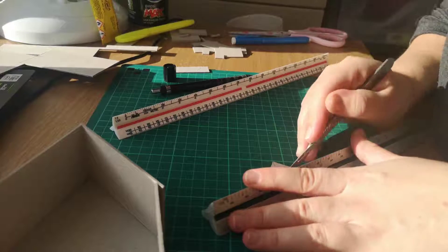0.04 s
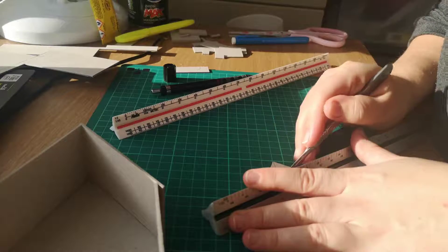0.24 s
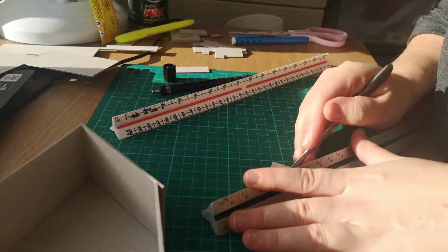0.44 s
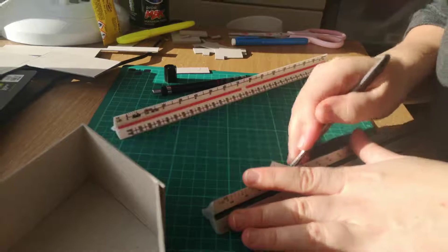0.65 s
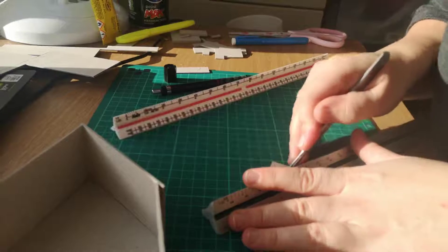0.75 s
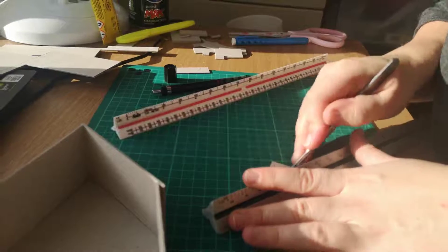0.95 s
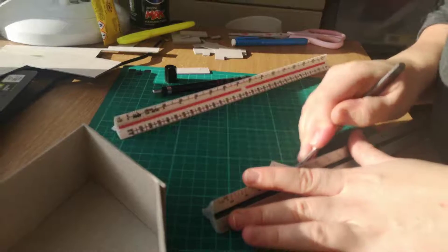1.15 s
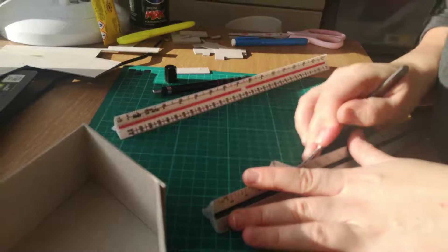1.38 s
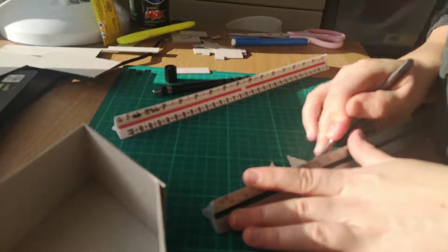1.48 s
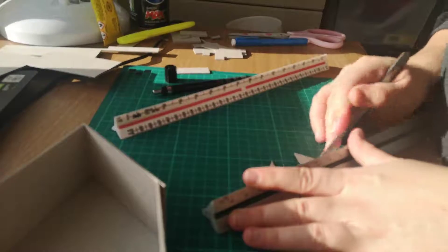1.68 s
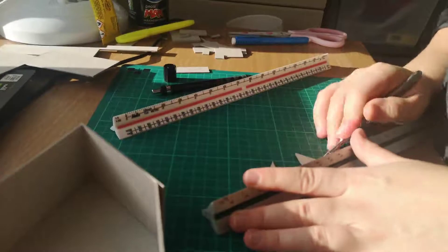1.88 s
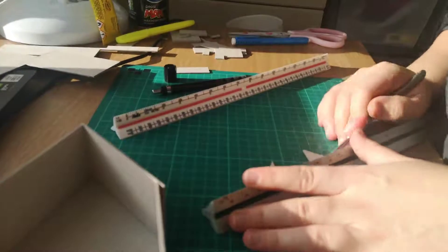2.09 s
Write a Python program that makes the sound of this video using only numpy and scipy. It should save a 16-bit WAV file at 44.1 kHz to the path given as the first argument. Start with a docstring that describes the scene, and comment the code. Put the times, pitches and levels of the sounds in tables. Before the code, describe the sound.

A craft knife scratches through thin card along a ruler, then knocks and skids on the mat

```python
"""A craft knife scores thin card along a ruler, on a cutting mat on a desk in a small quiet room.
The tip scratches and rings, then the blade cuts, drops onto the mat and skids: random fibre snaps
excite the resonances of what it touches. Knocks and drag excite the damped modes of the desk top.
Hands rub on card and ruler, more strongly at the end. Dying reflections and faint room noise surround all."""
import sys
import numpy as np
from scipy import signal
from scipy.fft import rfft, irfft
from scipy.io import wavfile

SR = 44100
rng = np.random.default_rng(int(sys.argv[2]) if len(sys.argv) > 2 else 0)


def master(y):
    """Save y as 16-bit WAV."""
    cut = np.clip(np.atleast_2d(y).T, -1, 1)
    pcm = np.round(cut * 32767)  # scale
    wavfile.write(sys.argv[1], SR, pcm.astype(np.int16))


N = 93800

# Force on the blade while it cuts the card: t/s, level/dB
CUT_FORCE = [(.88, -90), (.905, -76), (.94, -71), (.95, -63), (.975, -60), (1.03, -63), (1.085, -64.5),
             (1.125, -59), (1.17, -55), (1.24, -59), (1.3, -65), (1.36, -62.5), (1.41, -64.5), (1.475, -63),
             (1.5, -84)]
# Skid of the blade on the mat: attack/s, hold/s, release/s, level/dB
SKID_STROKE = (.046, .06, .058, -50.2)
SKID_START_S = 1.487


def undb(db):
    """An amplitude ratio is ten to the power of its level in dB over 20."""
    return 10 ** (np.asarray(db) / 20)


def unit(x):
    """Normalise the mean power, and so the rms, to 1."""
    return x / np.sqrt(np.mean(x ** 2))


def clock():
    """Uniform sampling: the time of every sample in seconds."""
    return np.arange(N) / SR


def convolve(x, response):
    """Linear superposition: each input sample launches the response; the result is cut to length."""
    return signal.fftconvolve(x, response)[:N]


def walk(rate):
    """Random modulation: straight lines join normal random values, `rate` of them per second."""
    knots = rng.standard_normal(4096)
    return np.interp(clock() * rate, np.arange(len(knots)), knots)


def follow(curve):
    """Amplitude envelope: gain along a curve of t/s, level/dB, linear in dB between points."""
    at, db = np.array(curve).T
    return undb(np.interp(clock(), at, db))


def stroke(start, attack, hold, release, db):
    """Transient envelope: linear rise, hold, then exponential decay of 20 dB per release time."""
    t = clock() - start
    rise = np.clip(t / attack, 0, 1)
    decay_db = 20 * np.maximum(t - attack - hold, 0) / release
    return rise * undb(db - decay_db)


def butter(x, hz, kind, order=2):
    """Maximally flat low-pass or high-pass filtering."""
    return signal.sosfilt(signal.butter(order, hz, kind, fs=SR, output="sos"), x)


def colour(x, points, rings=()):
    """Minimum-phase filtering: broad colour times Lorentzian resonances, each panned in level."""
    hz = np.maximum(np.arange(N // 2 + 1) * SR / N, 1)
    at, db = np.array(points).T
    broad = undb(np.interp(np.log(hz), np.log(at), db))
    sides = np.array([[.5], [-.5]])  # left and right share of the level difference
    peak_power = 1
    for f, width, level, pan in rings:
        peak_power = peak_power + undb(level + pan * sides) ** 2 / (1 + (2 * (hz - f) / width) ** 2)
    cepstrum = irfft(np.log(broad * np.sqrt(peak_power)), N)
    # Folding the even cepstrum onto positive times gives the causal minimum-phase response
    fold = 1 + np.sign(N / 2 - np.arange(N))
    fold[0] = 1
    response = np.exp(rfft(cepstrum * fold))
    return irfft(rfft(x) * response, N)


def tail(t60):
    """Diffuse reverberation: exponentially decaying noise of unit energy."""
    h = rng.standard_normal(N) * np.exp(-np.log(1000) * clock() / t60)
    return h / np.sqrt(np.sum(h ** 2))


def fibres():
    """Shot noise: about 9000 random snaps per second, of either sign and uneven size."""
    snaps_per_s = 9000
    chance, size, sign = rng.random(N), rng.exponential(size=N), rng.choice([-1, 1], N)
    snaps = (chance < snaps_per_s / SR) * sign
    return snaps * undb(2.5 * np.minimum(size, 5))  # 2.5 dB per unit of size


def scrape(force, points, rings=()):
    """Friction as filtered shot noise: the right port hears it later and partly decorrelated."""
    # Phase lead of the left port over the right: f/Hz, phase/rad
    lead = [(0, 0), (200, .1), (450, 1.3), (750, 3.1), (1000, 4.7), (1250, 6.6), (2000, 6.4), (2400, 9.0),
            (2800, 12.3), (3500, 12.7), (4400, 15.0), (7000, 25.1), (8500, 26.2), (16000, 45)]
    share = .58  # share of the scratching power common to both ports
    common = fibres()
    phase = np.interp(np.arange(N // 2 + 1) * SR / N, *np.array(lead).T)
    delayed = irfft(rfft(common) * np.exp(-1j * phase), N)
    shared = np.array([common, delayed])
    separate = np.array([fibres(), fibres()])
    snaps = np.sqrt(share) * shared + np.sqrt(1 - share) * separate
    sticking = undb(1.5 * walk(140))  # rapid unevenness of the friction
    return force * unit(colour(snaps * sticking, points, rings))


def room_tone():
    """Diffuse background noise: partly correlated hiss over a wavering rumble common to both ports."""
    # Colour of the air noise: f/Hz, level/dB
    air = [(20, 2), (38, -10), (60, -2), (110, -12), (150, -23), (200, -18), (300, -24), (400, -34),
           (620, -44), (1000, -36), (1900, -34.5), (2700, -36.5), (3500, -43), (6000, -45), (8000, -46),
           (11000, -51), (15500, -57)]
    hiss = [unit(butter(colour(rng.standard_normal(N), air), 260, "highpass")) for _ in range(3)]
    hiss = unit(np.array(hiss[:2]) + .6 * hiss[2])  # the third hiss reaches both ports
    hiss = hiss * undb(-72.5 + .6 * walk(6))
    rumble = unit(butter(colour(rng.standard_normal(N), air), 260, "lowpass"))
    return hiss + rumble * undb(-61.5 + 2.5 * walk(12))


def desk():
    """Modal response: soft pushes and the drag of the blade excite damped modes of the desk top."""
    # Modes of the desk top: f/Hz, level/dB, t60/s
    desk_modes = [(59, -9, .25), (72, -8, .14), (88, -5, .075), (121, -7, .11), (156, -15, .28),
                  (208, -27, .35), (303, -17, .3), (350, -22, .22), (418, -19, .2), (510, -20, .14)]
    # Knocks on the desk: t/s, level/dB, contact time/s
    knocks = [(.137, -49, .0022), (.6378, -51, .002), (.946, -44, .006), (.966, -42, .005),
              (1.018, -44, .012), (1.481, -17.3, .008), (1.4835, -32, .0032), (1.5045, -27, .011),
              (1.535, -37.5, .006), (1.59, -30, .01), (1.629, -39, .012), (1.657, -48, .004),
              (2.025, -44, .012)]
    t = clock()
    response = np.zeros(N)
    for hz, db, t60 in desk_modes:
        response += undb(db) * np.cos(2 * np.pi * hz * t) * np.exp(-np.log(1000) * t / t60)
    pushes = np.zeros(N)
    for at, db, contact in knocks:
        pulse = np.sin(np.pi * np.clip((t - at) / contact, 0, 1)) ** 2
        pushes += undb(db) * pulse * 2 / (contact * SR)  # equal impulse for any contact time
    # Shaking relative to the scraping force: 2.5 dB on the card, 3 dB on the mat
    drag = undb(2.5) * follow(CUT_FORCE) + undb(3) * stroke(SKID_START_S, *SKID_STROKE)
    rumble = drag * unit(butter(convolve(fibres(), response), 190, "lowpass"))
    return butter(rumble - convolve(pushes, response), 44, "highpass")


def hands():
    """Sliding friction: skin rubs on card and ruler, and a fingertip settles on the ruler."""
    # Rubbing as the grip shifts: t/s, level/dB
    rub_force = [(0, -80), (.3, -88), (.48, -90), (.56, -75), (.7, -72), (.85, -82), (1.6, -80),
                 (1.68, -72), (1.8, -79), (1.88, -71), (1.95, -73), (2.03, -67), (2.09, -65.5), (2.12, -61)]
    # Colour of the rubbing: f/Hz, level/dB
    skin_colour = [(60, 2), (150, 15), (220, 6), (310, 6), (700, -4), (2000, 0), (3000, -3), (4500, -9),
                   (8000, -12), (11000, -24), (15000, -30)]
    # Desk resonances under the hands: f/Hz, width/Hz, level/dB, left minus right/dB
    hand_rings = [(150, 25, 9, 0), (207, 20, 9, 0), (308, 20, 9, 0)]
    # Fingertip settling: attack/s, hold/s, release/s, level/dB
    scuff = (.002, .018, .04, -67)
    # Colour of the fingertip: f/Hz, level/dB
    finger_colour = [(100, -6), (300, 0), (550, 0), (800, -13), (2000, -18), (4000, -30), (15000, -45)]
    rubbing = scrape(follow(rub_force), skin_colour, hand_rings)
    return rubbing + scrape(stroke(.639, *scuff), finger_colour)


def tip_touches():
    """Contact excitation: the tip scratches as it is set down, and two touches ring the knife."""
    # Scratch, ringing and second light touch: attack/s, hold/s, release/s, level/dB
    scratch = (.014, .014, .035, -57.5)
    ringing = (.001, .042, .025, -62.5)
    retouch = (.002, .01, .02, -77)
    # Colours of tip and knife: f/Hz, level/dB
    tip_colour = [(200, -2), (500, 3), (800, 0), (1150, -8), (2000, -3), (2950, -2), (3400, -13),
                  (5000, -10), (7300, -6), (8500, 0), (9800, -2), (11000, -16), (15000, -19)]
    knife_colour = [(300, -8), (2500, 0), (9000, -3), (15000, -20)]
    # Resonances under the tip and of the knife: f/Hz, width/Hz, level/dB, left minus right/dB
    tip_rings = [(2420, 40, 8, 0), (2870, 130, 10, -8), (8050, 80, 2, -5), (8570, 80, 5, 3),
                 (9540, 300, 4, -9)]
    knife_rings = [(2820, 90, 15, -4), (4345, 90, 22, 0), (8000, 80, 10, 0)]
    tip_start = .136  # s
    touches = stroke(tip_start, *ringing) + stroke(.261, *retouch)
    set_down = scrape(stroke(tip_start, *scratch), tip_colour, tip_rings)
    return set_down + scrape(touches, knife_colour, knife_rings)


def card_cut():
    """Fracture noise: a first bite, then fibre snaps ring card and ruler, with a fine edge hiss."""
    # First bite: attack/s, hold/s, release/s, level/dB
    bite = (.002, .04, .055, -58.5)
    # Colours of bite, cut and edge hiss: f/Hz, level/dB
    grit_colour = [(120, -10), (240, -6), (450, 5), (900, -3), (1300, -7), (2200, -1), (3500, -13),
                   (8000, -26), (15000, -42)]
    card_colour = [(150, -14), (250, -17), (320, 1), (450, 1), (900, -3), (1300, -8), (2000, -4),
                   (3050, -1.5), (3300, -10), (5000, -19), (6500, -19), (7300, -13), (8800, -12.5),
                   (9500, -26), (15000, -33)]
    edge_colour = [(300, -30), (3000, -14), (4000, -6), (6000, -10), (7400, -2), (8700, 0), (9600, -16),
                   (15000, -35)]
    # Resonances of card and ruler: f/Hz, width/Hz, level/dB, left minus right/dB
    card_rings = [(845, 22, 4, 4), (1030, 35, 4, 0), (1570, 35, 3, 0), (1860, 50, 2, 0), (2072, 25, 7, 3),
                  (2140, 22, 6, 3), (2390, 40, 1, -4), (2815, 40, 6, -4), (2960, 100, 4.5, -4),
                  (8450, 600, -2, 1)]
    force = follow(CUT_FORCE)
    cut = scrape(stroke(.9445, *bite), grit_colour) + scrape(force, card_colour, card_rings)
    # The hiss grows faster than the force and lies 15 dB below it at its peak
    edge_force = undb(-15) * force.max() * (force / force.max()) ** 1.4
    return cut + scrape(edge_force, edge_colour)


def mat_skid():
    """Impact followed by sliding friction: the blade drops onto the mat and skids on."""
    # Drop onto the mat: attack/s, hold/s, release/s, level/dB
    drop = (.001, .006, .02, -49.5)
    # Colour of the mat: f/Hz, level/dB
    mat_colour = [(150, -4), (300, 1), (600, -3), (1500, -5), (2100, -1), (2950, 0), (3400, -8.5),
                  (5500, -10.5), (7600, -8), (9500, -16), (11500, -27), (15000, -31)]
    # Resonances on the mat: f/Hz, width/Hz, level/dB, left minus right/dB
    mat_rings = [(740, 35, 2, 10), (845, 30, 4, 5), (1250, 45, 7, -8), (2018, 18, 13, -3), (2100, 20, 8, 1),
                 (2394, 20, 6, -4), (2618, 20, 9, 4), (2703, 30, 11, 7), (2830, 40, 1, -4),
                 (4440, 60, 0, 0)]
    force = stroke(1.482, *drop) + stroke(SKID_START_S, *SKID_STROKE)
    return scrape(force, mat_colour, mat_rings)


def blade():
    """Superposition of the blade's contacts: tip set down, long cut, drop and skid."""
    return tip_touches() + card_cut() + mat_skid()


def scene():
    """Direct sound plus reverberation: two ports hear blade, hands and desk in the room."""
    background, thud = room_tone(), desk()
    scratch = hands() + blade()
    ports = []
    for direct in scratch:
        echoes = undb(-7) * convolve(direct, tail(.14))  # t60 of .14 s
        bass = thud + undb(-20) * convolve(thud, tail(.5))  # t60 of .5 s
        ports.append(direct + echoes + bass)
    return np.array(ports) + background


def record(dry):
    """Band limitation: the recorder's steep elliptic low-pass cuts the top above 15650 Hz."""
    return signal.sosfilt(signal.ellip(10, .2, 70, 15650, fs=SR, output="sos"), dry)


dry = scene()
out = record(dry)
master(out)
```